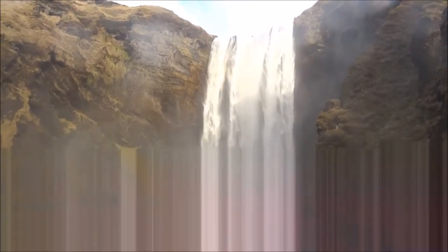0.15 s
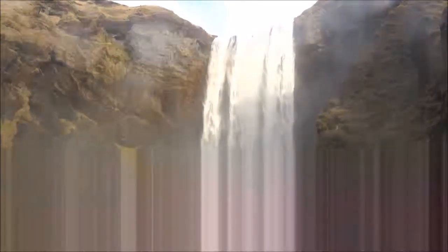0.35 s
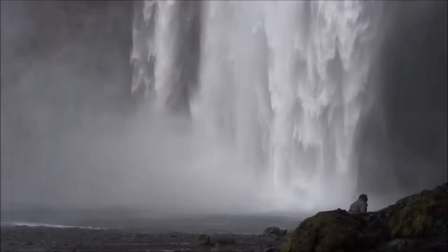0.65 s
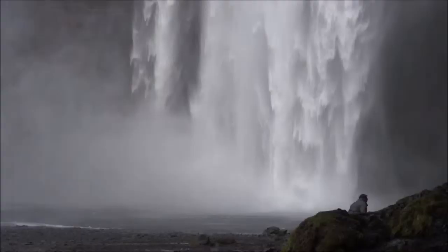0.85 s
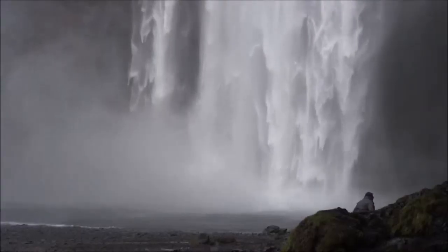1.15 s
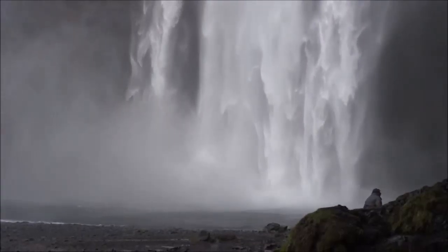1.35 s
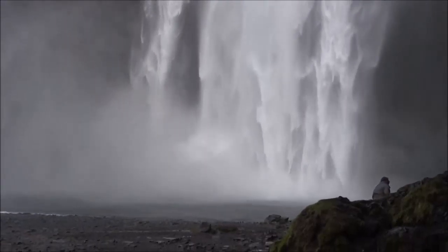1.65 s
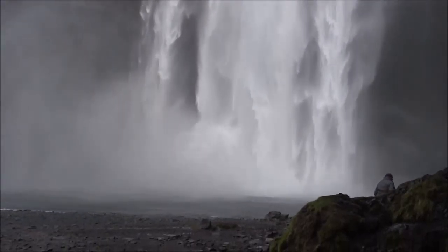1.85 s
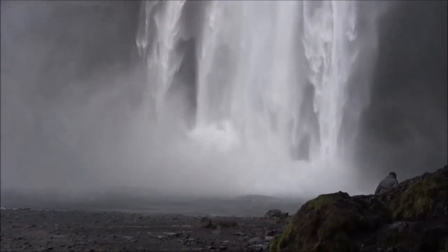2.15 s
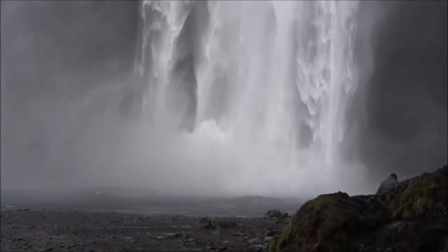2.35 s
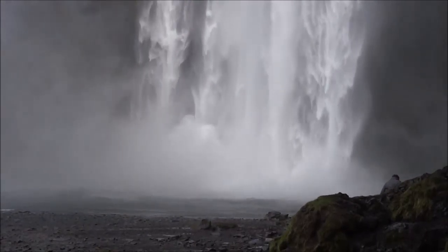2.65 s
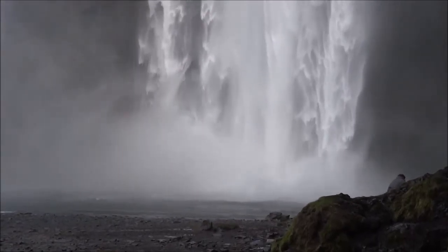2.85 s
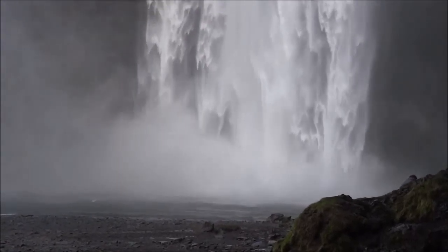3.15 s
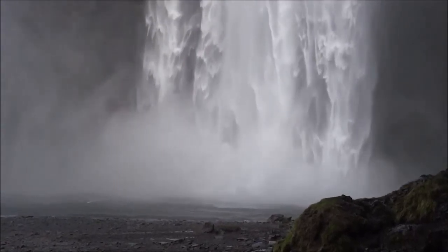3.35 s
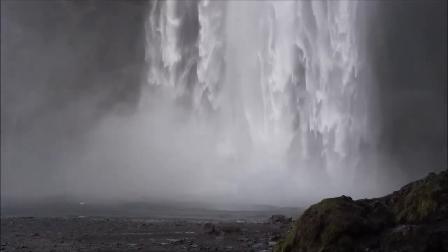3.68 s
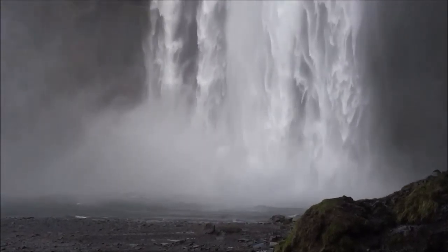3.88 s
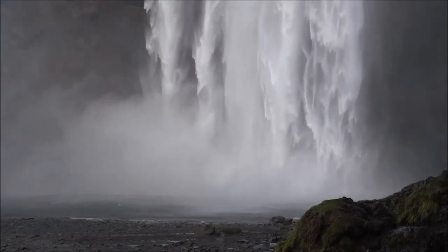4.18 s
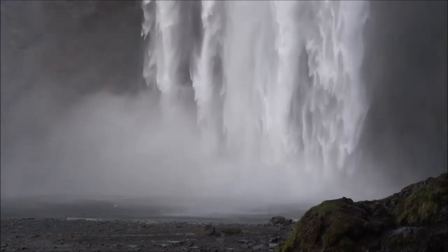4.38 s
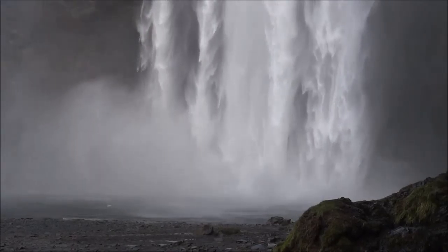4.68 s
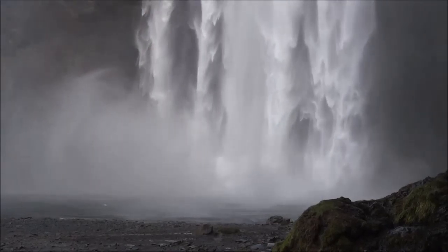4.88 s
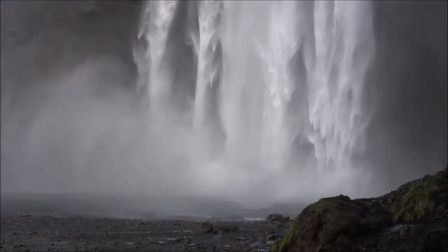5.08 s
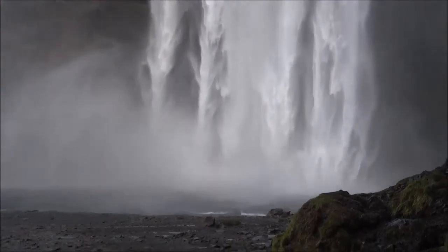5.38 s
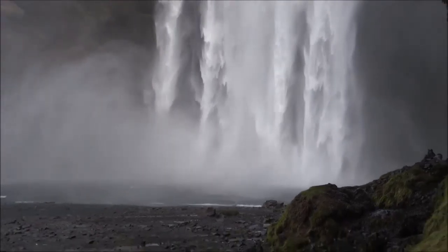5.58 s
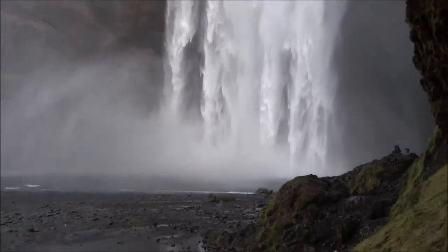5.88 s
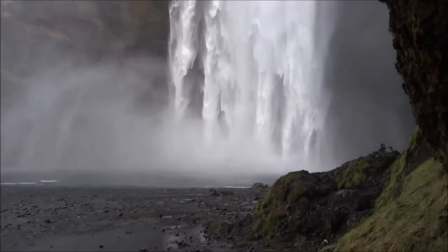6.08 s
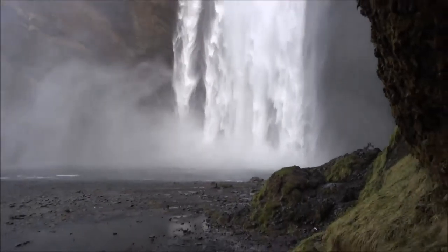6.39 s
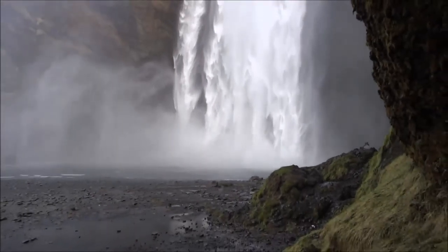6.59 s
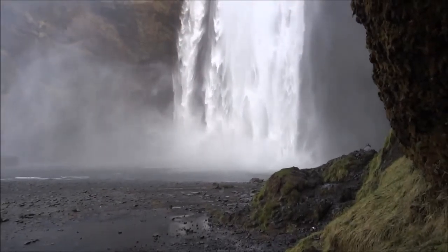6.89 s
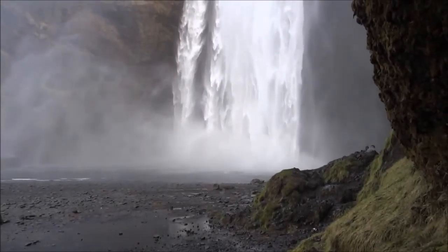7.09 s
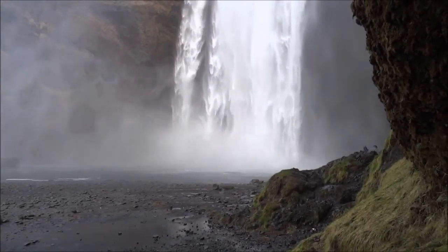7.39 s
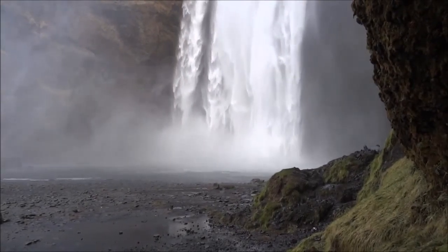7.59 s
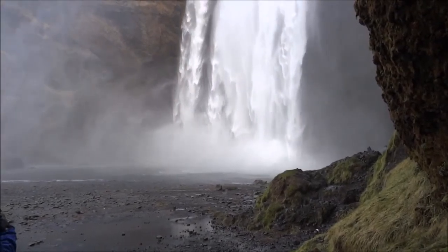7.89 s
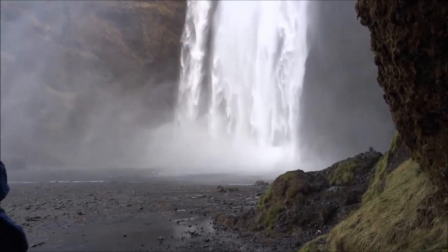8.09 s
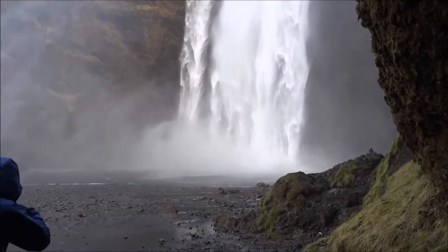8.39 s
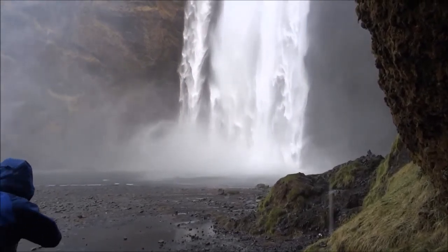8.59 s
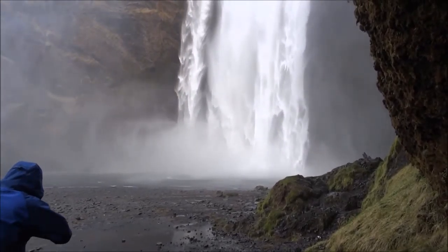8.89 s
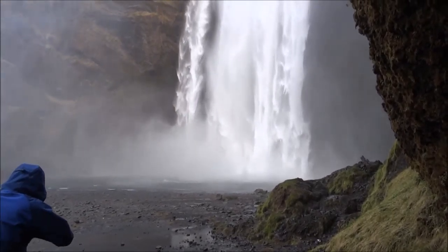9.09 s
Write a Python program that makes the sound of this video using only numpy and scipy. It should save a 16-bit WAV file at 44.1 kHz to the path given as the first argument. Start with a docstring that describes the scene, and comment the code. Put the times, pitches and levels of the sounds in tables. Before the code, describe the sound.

The first second is silent. At about 1.0 s the roar of a tall waterfall cuts in abruptly, drops out almost at once for a few milliseconds, and fades back within a few hundredths of a second, a little louder until about 1.15 s, when it settles. From there it is a loud, dense, continuous rush: deep thunder where water strikes the pool, broad mid-range noise of falling sheets, and a softer high hiss of spray. The texture is patchy and fluttering, with slow, small swells near 3 s, 4.7 s and 5.75 s, and quick slight falls after 4.7 s and around 7.3 s. Between about 6.7 and 7.5 s a few tiny crisp drops tick close by, almost buried. The roar rises slightly towards 9 s and continues to the end. Outdoor stereo, mostly centred, slight width from the cliffs, highest treble rolled off.

```python
"""A tall waterfall crashes into its pool, heard by two ports across the gravel.
The plunge thunders, the sheets rush and the spray hisses: three bands of noise with patchy, wavering levels.
A few drops tick close by, each a very short burst of band-limited noise.
After a second of silence the sound cuts in, drops out for a moment, fades back loud and settles."""
import sys
import numpy as np
from scipy import signal
from scipy.fft import rfft, irfft, next_fast_len
from scipy.io import wavfile
from scipy.ndimage import uniform_filter1d, map_coordinates

SR = 44100
rng = np.random.default_rng(int(sys.argv[2]) if len(sys.argv) > 2 else 0)


def wav_record(signal):
    """Record a signal, one row per channel, as 16-bit PCM in the file named by sys.argv[1]."""
    frames = np.transpose(np.atleast_2d(signal))
    bounded = np.clip(frames, -1, 1)
    # unit amplitude maps onto the largest positive 16-bit level
    quanta = np.round(bounded * 32767).astype(np.int16)
    wavfile.write(sys.argv[1], SR, quanta)


N = 407484

# Slow swells and quick falls of the whole roar: (time [s], level of the rush before the opening boost [dB])
ROAR_LEVEL = [(1.2, -16.5), (1.8, -16.5), (2.3, -15.5), (2.75, -15), (3.05, -14.2), (3.2, -15), (4.0, -16),
              (4.72, -14), (4.9, -16.5), (5.4, -15.5), (5.75, -14.3), (6.2, -15), (7.22, -14.5),
              (7.36, -17), (8.0, -16), (8.3, -15), (8.78, -15.5), (9.1, -14)]
# Weight of the plunge: (time [s], level relative to the rush [dB])
PLUNGE_LEVEL = [(1.1, -6), (1.2, -2.5), (1.9, -5.5), (2.6, -2.5), (4.5, -4), (6.8, -3), (8.1, -4.5),
                (9.2, -3)]
# Colour of the plunge into the pool: (frequency [Hz], relative density [dB per Hz])
POOL_COLOUR = [(15, -35), (25, -7), (48, -5), (74, -4.5), (90, -.5), (130, -0.5), (250, -2), (340, -3.5),
               (450, -7), (600, -5), (900, -8.5), (2000, -9)]
# Colour of the falling sheets and their spray: (frequency [Hz], relative density [dB per Hz])
SHEETS_COLOUR = [(180, -28), (300, 0), (446, -3.5), (600, -1.5), (850, -4.5), (1440, -6), (1750, -5),
                 (2700, -5), (3300, -6), (4200, -6.5), (5200, -10), (7620, -14), (11300, -21), (15500, -32)]
# Drops close by: (time [s], level before attack and decay [dB], pitch [Hz], half-width of the band [Hz])
DROP_HITS = [(6.677, -28, 14000, 1500), (7.0758, -10, 6000, 5000), (7.2134, -17, 11000, 2500),
             (7.5194, -17, 5500, 4000)]
# Phase between the ports: (frequency [Hz], lead of the left over the right [rad])
PORT_LEAD = [(20, 0), (70, -0.15), (200, -0.33), (520, -0.55), (1500, -0.16), (3200, -0.22), (8000, 0)]
# Balance between the ports: (frequency [Hz], left minus right [dB])
PORT_TILT = [(60, 1.0), (240, 0.61), (950, 0.0), (3770, 0.0), (15000, 0.0)]
# Unrelated sound, opposite in the two ports: (frequency [Hz], level relative to the direct roar [dB])
UNRELATED_LEVEL = [(30, -24), (100, -21), (250, -18), (600, -14), (2000, -17.5), (4800, -15.5), (7000, -19),
                   (10000, -35.5), (15000, -42)]

PLUNGE_HZ, SPRAY_HZ = 544, 5530  # where plunge hands over to rush, and rush to spray
SPRAY_DB = -6.5  # relative to the rush
OPENING_DB, SETTLE_S, SETTLE_LEN_S = 4, 1.104, 0.045  # opening boost, when it starts to go, how long that takes
CUT_IN_S, DROP_S, BACK_S = 0.9955, 1.0035, 1.008  # the sound starts, drops out, begins to return
RISE_S, FALL_S, FADE_S = 0.0003, 0.0017, 0.022  # lengths of those three ramps
DROP_DB = -36  # depth of the drop-out
TOP_HZ = 15750  # middle of the steep upper band edge


def amp(db):
    """Decibels to gain."""
    return 10 ** (np.asarray(db) / 20)


def unit(x):
    """Scale to rms 1."""
    return x / np.sqrt(np.mean(x ** 2) + 1e-20)


def along(points, hz):
    """Read a (frequency, value) table at any frequency, on a log axis."""
    point_hz, values = np.transpose(points)
    return np.interp(np.log(hz + 1), np.log(point_hz + 1), values)


def level_curve(points):
    """Read a (time, level) table at every sample."""
    times, levels = np.transpose(points)
    return np.interp(np.arange(N) / SR, times, levels)


def wobble(rate_hz):
    """A smooth random curve with rate_hz knots a second."""
    knots = rng.standard_normal(int(N * rate_hz / SR) + 4)
    return map_coordinates(knots, [np.arange(N) * rate_hz / SR])


def ramp(start_s, length_s):
    """0 before the start, then a straight line up to 1."""
    return np.clip((np.arange(N) / SR - start_s) / length_s, 0, 1)


def filtered(x, response):
    """Shape x with a complex response of frequency, padded so that the end does not wrap round."""
    size = next_fast_len(N + 8192)
    spectrum = rfft(x, size) * response(np.fft.rfftfreq(size, 1 / SR))
    return irfft(spectrum, size)[..., :N]


def below(hz, edge_hz):
    """Share of the power that lies on the low side of a hand-over."""
    return 1 / (1 + (hz / edge_hz) ** 4)


def churn(colour, share, patchy_db):
    """Direct and diffuse noise in one colour; clumps of water land as patches of random gain."""
    noise = rng.standard_normal((2, N + 512))
    cells = signal.stft(noise, nperseg=512)[2]
    # smear random gains over neighbouring frequencies, then over time; both noises share them
    patches = rng.standard_normal(cells.shape[1:])
    patches = uniform_filter1d(patches, size=6, axis=0)
    patches = uniform_filter1d(patches, size=10, axis=1)
    patchy = signal.istft(cells * amp(patchy_db * unit(patches)), nperseg=512)[1][:, :N]
    return unit(filtered(patchy, lambda hz: amp(along(colour, hz)) * np.sqrt(share(hz))))


def plunge():
    """The thunder of water hitting the pool: low noise with a slow weight and its own flutter."""
    thunder = churn(POOL_COLOUR, lambda hz: below(hz, PLUNGE_HZ), patchy_db=1.16)
    return amp(level_curve(PLUNGE_LEVEL) + 0.53 * wobble(10)) * thunder


def rush():
    """The falling sheets: noise between the two hand-overs, the reference level of the roar."""
    return churn(SHEETS_COLOUR, lambda hz: (1 - below(hz, PLUNGE_HZ)) * below(hz, SPRAY_HZ), patchy_db=1.01)


def spray():
    """The hiss of fine water: noise above the upper hand-over, with a faster flutter."""
    hiss = churn(SHEETS_COLOUR, lambda hz: 1 - below(hz, SPRAY_HZ), patchy_db=0.65)
    return amp(SPRAY_DB + 0.2 * wobble(30)) * hiss


def waterfall():
    """Plunge, rush and spray ride one shared surge, boosted at the opening."""
    opening_db = OPENING_DB * (1 - ramp(SETTLE_S, SETTLE_LEN_S))
    surge_db = level_curve(ROAR_LEVEL) + opening_db + 0.13 * wobble(14)
    return amp(surge_db) * (plunge() + rush() + spray())


def drops():
    """Each drop is a few milliseconds of noise in a band around its pitch."""
    out, t = np.zeros(N), np.arange(600) / SR
    bins_hz = np.fft.rfftfreq(len(t), 1 / SR)
    attack = 1 - np.exp(-t / 0.0006)
    for time_s, level_db, pitch_hz, width_hz in DROP_HITS:
        band = np.exp(-((bins_hz - pitch_hz) / width_hz) ** 2)
        tick = unit(irfft(rfft(rng.standard_normal(len(t))) * band, len(t)))
        decay = amp(level_db - 60 * t / 0.027)  # falls 60 dB in 27 ms
        out[round(time_s * SR):][:len(t)] += decay * attack * tick
    return out


def scene():
    """The direct sound reaches the ports with a small phase lead and tilt; an unrelated part is added, opposite
    in each port."""
    direct, diffuse = waterfall()
    sides = np.array([[0.5], [-0.5]])  # left, right: each takes half of the difference

    def port_response(hz):
        """Level and phase at each port."""
        return amp(sides * along(PORT_TILT, hz)) * np.exp(1j * sides * along(PORT_LEAD, hz))

    ports = filtered(direct + drops(), port_response)
    unrelated = filtered(diffuse, lambda hz: amp(along(UNRELATED_LEVEL, hz)))
    return ports + 2 * sides * unrelated  # opposite polarity left and right


def record(dry):
    """The sound cuts in and dips, the tallest peaks flatten towards full scale, the band ends steeply."""
    dip = (1 - amp(DROP_DB)) * (ramp(DROP_S, FALL_S) - ramp(BACK_S, FADE_S))
    gated = dry * (ramp(CUT_IN_S, RISE_S) - dip)
    flattened = gated / (1 + np.abs(gated) ** 8) ** (1 / 8)
    return filtered(flattened, lambda hz: np.clip((TOP_HZ + 150 - hz) / 300, 0, 1) ** 2)


dry = scene()
out = record(dry)
wav_record(out)
```